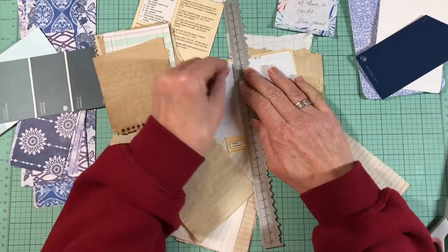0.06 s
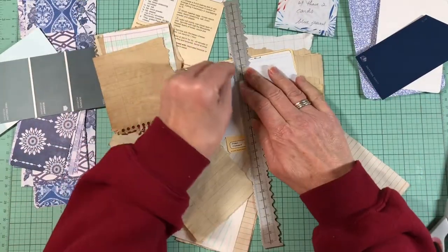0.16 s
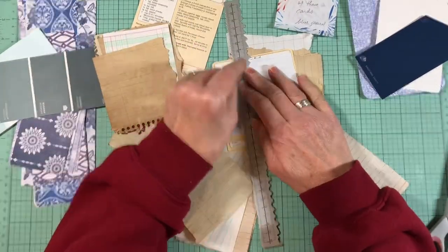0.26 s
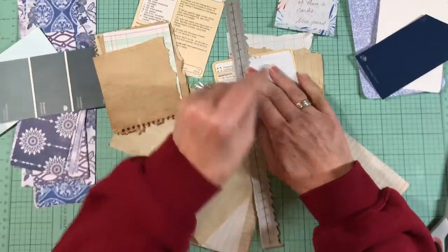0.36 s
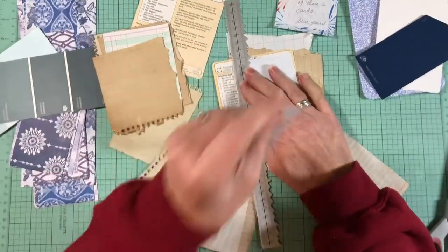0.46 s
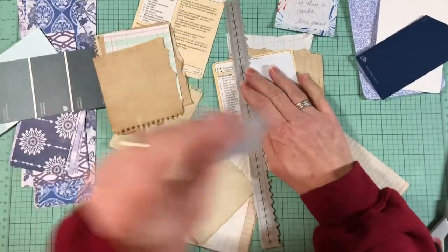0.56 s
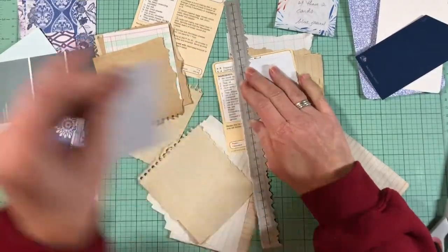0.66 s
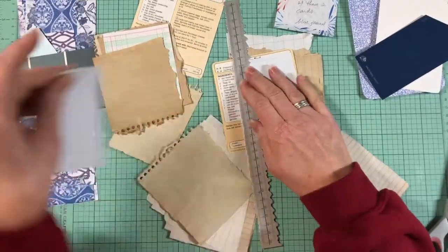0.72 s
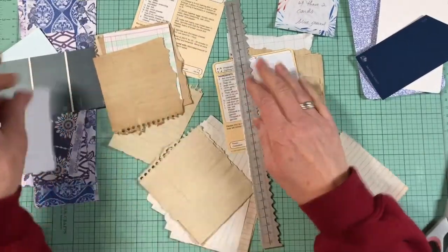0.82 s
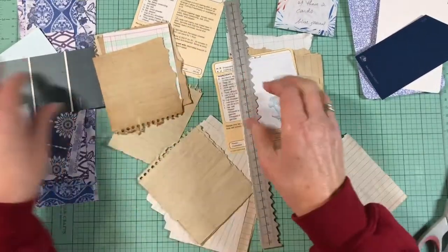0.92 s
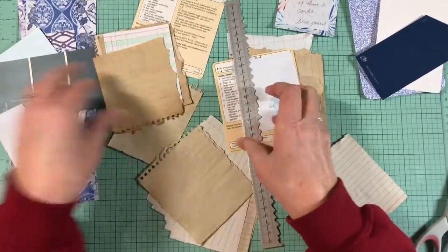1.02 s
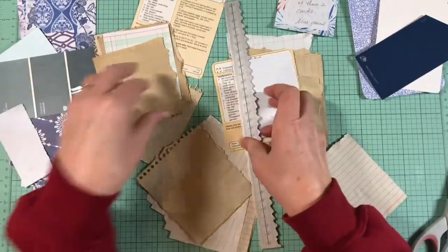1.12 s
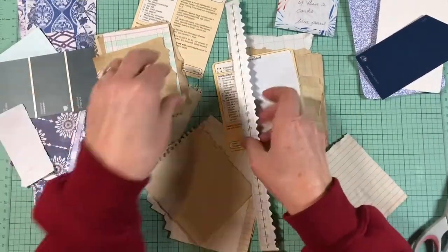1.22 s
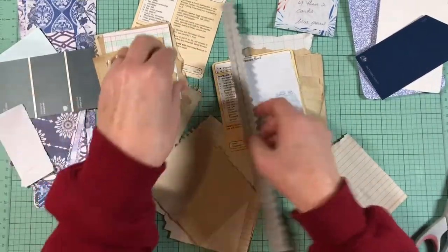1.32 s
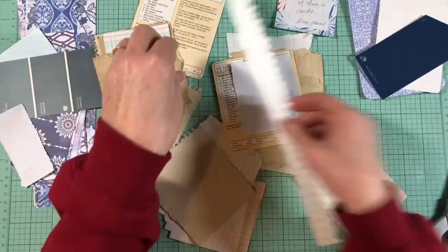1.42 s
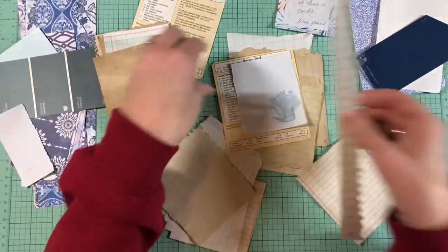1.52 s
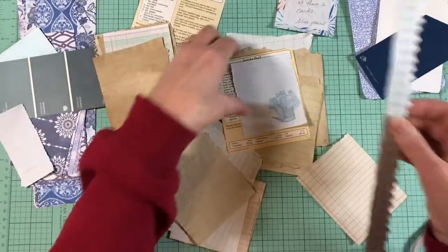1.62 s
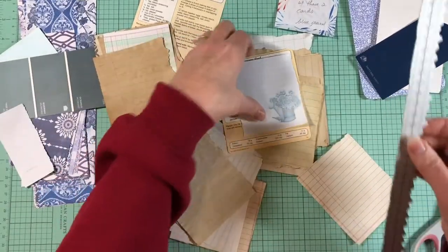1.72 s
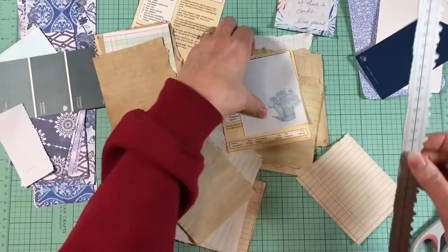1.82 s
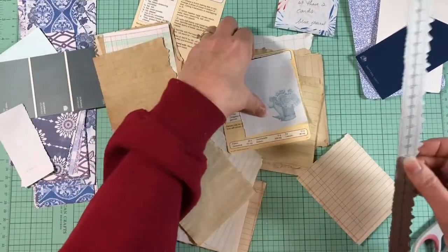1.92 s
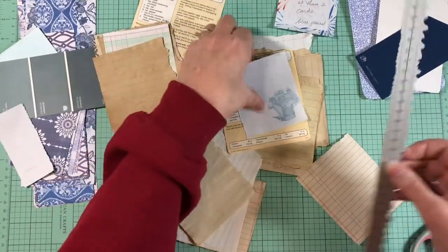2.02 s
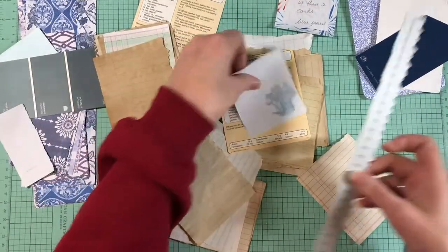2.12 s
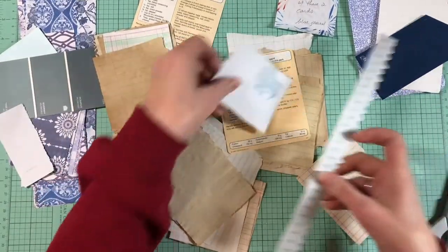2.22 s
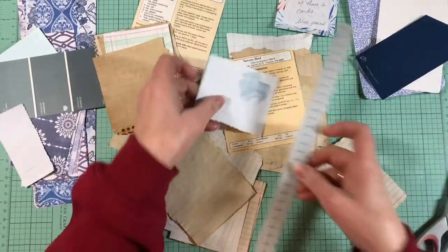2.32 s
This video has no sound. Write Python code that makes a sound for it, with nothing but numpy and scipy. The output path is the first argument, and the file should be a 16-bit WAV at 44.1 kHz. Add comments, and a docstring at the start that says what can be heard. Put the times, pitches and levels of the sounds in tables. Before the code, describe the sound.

Paper torn in a single short crackling burst along a metal edge, followed by quiet rustles and ticks

```python
"""Paper rips along a toothed metal ruler on a craft table: fibres part as dense noise grains, and
each tooth gives a snap, a noise crack with a damped resonance. Later, sheets and ruler are shuffled,
with coloured grains for slides, small snaps for ticks and resonant noise for scuffs.
Narrow-band modes make the table boom and a decaying sine the ruler's hum; decaying noise makes
the room's reflections, and steady coloured noise its low rumble."""
import sys
import numpy as np
from scipy import signal
from scipy.fft import rfft, irfft
from scipy.io import wavfile
from scipy.ndimage import uniform_filter1d

SR = 44100
rng = np.random.default_rng(int(sys.argv[2]) if len(sys.argv) > 2 else 0)


def transcribe(u):
    """Save the signal u as a 16-bit wav file named by the first command-line argument.

    u: samples, shape (n,) or (channels, n), limited to [-1, 1]; the rate is SR.
    q: integer samples, one column per channel.
    """
    v = np.clip(np.atleast_2d(u).T, -1, 1)
    q = np.round(v * 32767).astype(np.int16)
    wavfile.write(sys.argv[1], SR, q)


N = 105840

# Snaps of the rip: start_s [s], crack_peak_db [dB], body_pitch_hz [Hz], body_level_db [dB]
RIP_SNAPS = [(.2366, -7, 2740, -31), (.2397, -2.5, 2600, -27.5), (.2465, -10.5, 1900, -32.5),
             (.2580, -6, 1530, -28), (.2658, -11.5, 1240, -30), (.2680, -1.5, 3000, -31.5),
             (.2735, -17, 4996, -30.5), (.2950, -19.5, 3600, -29.5), (.3035, -23.5, 3820, -24),
             (.3130, -17, 1470, -26.5), (.3213, -22, 3630, -27.5), (.3280, -21.5, 1050, -29.5),
             (.3320, -20, 2940, -27), (.3388, -16.5, 1000, -25), (.3440, -22, 2430, -31),
             (.3878, -42, 2430, -35)]
# Spectrum of a crack: frequency_hz [Hz], density_db [dB per Hz]
CRACK_SPECTRUM = [(1500, -17.5), (8000, -17), (11500, -9.5), (15700, -2.5), (16800, -28)]
CRACK_DECAY_S, FIZZ_T60_S, FIZZ_DB = 0.0004, 0.014, -21  # fizz level is relative to the crack's onset
RIP_BODY_T60_S, RIP_BODY_Q = 0.011, 2.2
SNAP_SAMPLES, LEAD_SAMPLES = 4096, 64  # the lead leaves room for the filter's pre-ringing

# Tearing fibres: time_s [s], middle_db [dB], treble_db [dB], table_boom_db [dB]
TEAR_LEVELS = [(.234, -67, -69.5, -74), (.238, -25.5, -36.5, -38.5), (.254, -37, -37.5, -32),
               (.285, -30.5, -34.5, -26.5), (.32, -32, -32.5, -40), (.35, -32.5, -33.5, -33),
               (.384, -34, -40.5, -44), (.4, -47, -67, -37.5), (.46, -72, -89, -68)]
# Spectrum of tearing: frequency_hz [Hz], density_db [dB per Hz]
TEAR_SPECTRUM = [(300, -7.5), (1020, -8), (2700, -11), (4000, -8.5), (7400, -20.5), (11500, -14),
                 (15500, -13.5)]
SPLIT_HZ = 10000  # between middle and treble

# Ticks of handled paper and ruler: start_s [s], crack_peak_db [dB], body_pitch_hz [Hz], body_level_db [dB]
TICKS = [(0.6706, -63, 3380, -58), (0.8614, -54, 1730, -51.5), (0.8902, -46, 2050, -54),
         (0.907, -65, 1605, -56.5), (1.0353, -36, 4800, -56.5), (1.0531, -37.5, 1860, -49.5),
         (1.1036, -39.5, 3090, -48.5), (1.1188, -46, 2670, -56.5), (1.179, -39.5, 2920, -61),
         (1.197, -42, 5240, -56.5), (1.312, -46, 9100, -73), (1.398, -60, 2250, -66),
         (1.706, -48, 3402, -51.5), (1.7355, -43.5, 3410, -55.5), (1.7669, -51, 2180, -66),
         (2.0527, -27.5, 15000, -42), (2.063, -45, 14600, -52.5)]
TICK_BODY_T60_S, TICK_BODY_Q = 0.028, 1.23

# Sheets sliding: time_s [s], middle_db [dB], treble_db [dB]
SLIDE_LEVELS = [(0, -74, -75), (.09, -66.5, -66.5), (.163, -78, -76), (0.169, -37.5, -36.5),
                (0.179, -50, -55), (.2, -62, -66), (0.601, -80, -87), (.615, -68, -73), (0.729, -61, -65),
                (.772, -66.5, -64), (0.791, -76.5, -75.5), (0.856, -78.5, -72), (0.864, -63, -68),
                (.93, -84, -82), (1.02, -82, -84), (1.094, -67.5, -58), (1.11, -48.5, -51.5),
                (1.134, -71.5, -74), (1.2, -56.5, -50.5), (1.232, -65, -67), (1.248, -58.5, -54.5),
                (1.275, -69, -61), (1.3, -66, -60.5), (1.419, -80.5, -76.5), (1.69, -79.5, -83),
                (1.731, -65.5, -81.5), (1.79, -86.5, -72.5), (1.845, -64, -70), (1.869, -85, -74),
                (1.95, -81, -82), (1.979, -65, -65.5), (2.059, -53.5, -49), (2.11, -54, -56),
                (2.124, -47.5, -50.5), (2.199, -56.5, -54.5), (2.3, -72.5, -66.5), (2.4, -70, -81)]
# Spectrum of sliding: frequency_hz [Hz], density_db [dB per Hz]
SLIDE_SPECTRUM = [(400, -25.5), (1000, -11), (2000, -3), (4500, -1.5), (8500, -13), (12500, -2),
                  (14000, -6), (15800, -4)]

# Dull scuffs of a sheet edge on the mat: start_s [s], pitch_hz [Hz], peak_gain_db [dB]
SCUFFS = [(0.856, 506, -57), (2.23, 1530, -53.5)]
SCUFF_RISE_S, SCUFF_Q = 0.014, 1.1

# Low modes of the table top: pitch_hz [Hz], resonator_width_hz [Hz], relative_level_db [dB]
TABLE_MODES = [(137, 25, 2.5), (193.6, 31, -7), (286, 42, -7), (514, 45, -13.5)]
# Soft bumps of hand and ruler on the table: start_s [s], drive_db [dB]
BUMPS = [(0.171, -53.5), (0.672, -60), (1.109, -54.5)]
BUMP_TIME_S = 0.022
BOOM_LOW_HZ, BOOM_HIGH_HZ = 85, 900  # the boom is kept within this band

# Ruler humming on after the rip: pitch_hz [Hz], mean_level_db [dB], t60_s [s]
RULER_MODES = [(343.6, -56, 2.5)]
RULER_START_S = 0.29

# Reverberation time of the room: frequency_hz [Hz], t60_s [s]
ROOM_T60 = [(500, 0.39), (4000, 0.28), (16000, 0.082)]
ROOM_DB, ROOM_DELAY_S = -11, 0.0013

# Spectrum of the room's rumble and hiss: frequency_hz [Hz], density_db [dB per Hz]
AIR_SPECTRUM = [(20, -12), (151, -0.5), (361, -14), (650, -20), (2510, -33), (15000, -40)]
AIR_DB = -60.5
TOP_HZ = 15900


def undb(db):
    """Amplitude ratio: twenty decibels make a factor of ten."""
    return 10 ** (np.asarray(db) / 20)


def unit(x):
    """Normalisation to an RMS of one."""
    return x / np.sqrt(np.mean(x ** 2))


def fall(t, t60):
    """Exponential decay: the level falls 60 dB in t60 seconds."""
    return np.exp(-np.log(1000) * t / t60)


def shape(x, spectrum):
    """Linear filtering: gain in dB runs straight over log frequency between the points."""
    hz, db = np.array(spectrum).T
    frequency = np.fft.rfftfreq(len(x), 1 / SR) + 1  # + 1 avoids log(0)
    gain_db = np.interp(np.log(frequency), np.log(hz), db, left=db[0] - 27.0)
    return irfft(rfft(x) * undb(gain_db), len(x))


def band(x, lo_hz, hi_hz):
    """Band limitation by a Butterworth filter."""
    sos = signal.butter(2, [lo_hz, min(hi_hz, .45 * SR)], "band", fs=SR, output="sos")
    return signal.sosfilt(sos, x)


def ring(x, hz, width_hz):
    """Simple resonance: a single damped mode driven by x."""
    b, a = signal.iirpeak(hz, hz / width_hz, fs=SR)
    return signal.lfilter(b, a, x)


def curve(table, column):
    """Amplitude envelope: dB levels joined over time, -120 dB outside the table."""
    rows = np.array(table)
    return undb(np.interp(np.arange(N) / SR, rows[:, 0], rows[:, column], left=-120, right=-120))


def walk(rate):
    """Random modulation: Gaussian levels, rate per second, joined by ramps; RMS near one."""
    hold = max(int(SR / rate), 1)
    steps = np.repeat(rng.standard_normal(N // hold + 1), hold)
    return unit(uniform_filter1d(steps, hold))[:N]


def snaps(table, body_t60, q):
    """Impulsive excitation: a bright crack with a fizz after it, and a short resonance of the sheet."""
    cracks, bodies = np.zeros(N + SNAP_SAMPLES), np.zeros(N + SNAP_SAMPLES)
    t = np.arange(SNAP_SAMPLES) / SR
    noise = rng.standard_normal((len(table), 2, SNAP_SAMPLES))
    crack_envelope = np.exp(-t / CRACK_DECAY_S) + undb(FIZZ_DB) * fall(t, FIZZ_T60_S)
    for (start_s, peak_db, hz, body_db), (crack_noise, body_noise) in zip(table, noise):
        crack = shape(np.roll(crack_noise * crack_envelope, LEAD_SAMPLES), CRACK_SPECTRUM)
        push = np.sign(body_noise) * fall(t, body_t60)
        body = ring(ring(push, hz, hz / q), hz, hz)
        onset_rms = np.sqrt(np.mean(body[:256] ** 2))  # body level is set over its first 6 ms
        i = int(start_s * SR)
        cracks[i:i + SNAP_SAMPLES] += undb(peak_db) * crack / abs(crack).max()
        bodies[i:i + SNAP_SAMPLES] += undb(body_db) * body / onset_rms
    return cracks[LEAD_SAMPLES:N + LEAD_SAMPLES] + bodies[:N]


def grains(spread_db, patchy_db, rate):
    """Granular friction: dense clicks of very unequal size that come in patches."""
    clicks = rng.standard_normal(N)
    size = np.minimum(rng.exponential(size=N), 5)
    return clicks * undb(spread_db * size + patchy_db * walk(rate))


def rub(spectrum, levels, spread_db, patchy_db, flicker_db, rate):
    """Filtered friction: the sheet colours the grains, and its third-octaves flicker as the paper bends."""
    sheet = rfft(shape(grains(spread_db, patchy_db, rate), spectrum))
    thirds = 3 * np.log2((np.fft.rfftfreq(N, 1 / SR) + 1) / SPLIT_HZ)
    out = 0
    for column, bands in ((1, range(-16, 0)), (2, range(0, 5))):  # middle, treble
        part = 0
        for k in bands:
            overlap = np.clip(1 - abs(thirds - k - .5), 0, 1)
            part = part + irfft(sheet * overlap, N) * undb(flicker_db * walk(110))
        out = out + unit(part) * curve(levels, column)
    return out


def scuffs():
    """Resonant friction: a rounded low rasp that swells and fades."""
    t = np.arange(N) / SR
    out = 0
    for start_s, hz, db in SCUFFS:
        age = np.maximum(t - start_s, 0) / SCUFF_RISE_S
        width_hz = hz / SCUFF_Q
        rasp = unit(ring(ring(rng.standard_normal(N), hz, width_hz), hz, width_hz))
        out = out + undb(db) * (age * np.exp(1 - age)) ** 2 * rasp
    return out


def table_boom():
    """Modal vibration: tugging hand and bumps shake the table's modes; each swings evenly, pitch wavering."""
    push, t = rng.standard_normal(N), np.arange(N) / SR
    force = curve(TEAR_LEVELS, column=3)
    for start_s, db in BUMPS:
        age = np.maximum(t - start_s, 0) / BUMP_TIME_S
        force = force + undb(db) * age * np.exp(1 - age) ** 2  # peaks 2.7 dB above the drive
    modes = 0
    for hz, width_hz, db in TABLE_MODES:
        narrow = ring(ring(push, hz, width_hz), hz, width_hz)
        swing = np.cos(np.angle(signal.hilbert(narrow)))  # keeps the phase, evens the amplitude
        modes = modes + undb(db) * swing
    boom = unit(modes) * force
    return band(band(boom, BOOM_LOW_HZ, BOOM_HIGH_HZ), BOOM_LOW_HZ, BOOM_HIGH_HZ)


def ruler():
    """Free vibration: bending of the metal strip dies away exponentially, its level slightly unsteady."""
    t = np.maximum(np.arange(N) / SR - RULER_START_S, 0)
    out = 0
    for hz, db, t60 in RULER_MODES:
        out = out + undb(db + 7.4 * walk(34)) * np.sin(2 * np.pi * hz * t) * fall(t, t60)
    return out


def room(x):
    """Reverberation: a short diffuse tail of reflections, the treble dying first."""
    t = np.arange(SR // 2) / SR
    hz, t60 = np.array(ROOM_T60).T
    tail = 0
    for centre_hz in 90 * 2 ** np.arange(0, 7.6, .5):  # half-octave steps
        decay = fall(t, np.interp(np.log(centre_hz), np.log(hz), t60))
        noise = band(rng.standard_normal(len(t)), centre_hz / 2 ** .5, centre_hz * 2 ** .5)
        tail = tail + noise * decay * (t > ROOM_DELAY_S)
    unit_energy_tail = tail / np.sqrt(np.sum(tail ** 2))
    return signal.fftconvolve(x, unit_energy_tail)[:N] * undb(ROOM_DB)


def air():
    """Stationary noise: steady rumble and hiss of the room."""
    return undb(AIR_DB) * unit(shape(rng.standard_normal(N), AIR_SPECTRUM))


def scene():
    """Superposition: the near sounds excite the room; boom, hum and air add directly."""
    rip = snaps(RIP_SNAPS, RIP_BODY_T60_S, RIP_BODY_Q)
    rip = rip + rub(TEAR_SPECTRUM, TEAR_LEVELS, spread_db=2.5, patchy_db=3.0, flicker_db=1.75, rate=500.)
    handling = snaps(TICKS, TICK_BODY_T60_S, TICK_BODY_Q)
    slides = rub(SLIDE_SPECTRUM, SLIDE_LEVELS, spread_db=1.42, patchy_db=0.66, flicker_db=3.0, rate=190.0)
    near = rip + handling + slides + scuffs()
    return (near + room(near) + table_boom() + ruler() + air())[None]


def record(dry):
    """Low-pass filtering: the microphone chain cuts the top steeply."""
    return signal.sosfilt(signal.ellip(10, .3, 70, TOP_HZ, fs=SR, output="sos"), dry)


dry = scene()
out = record(dry)
transcribe(out)
```